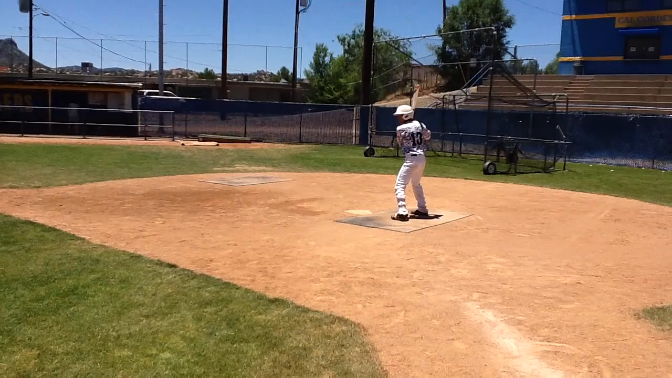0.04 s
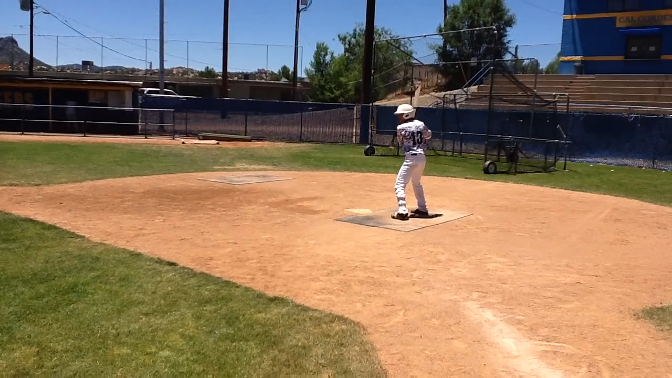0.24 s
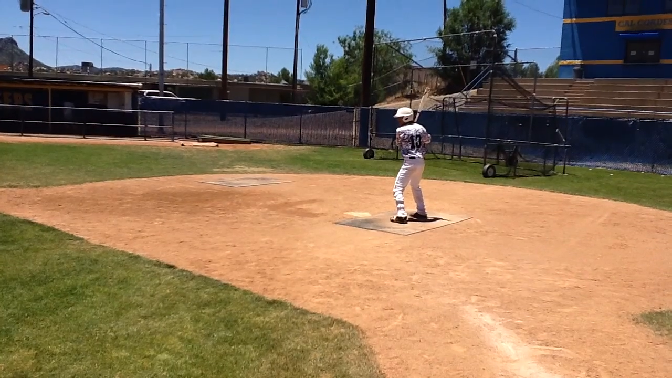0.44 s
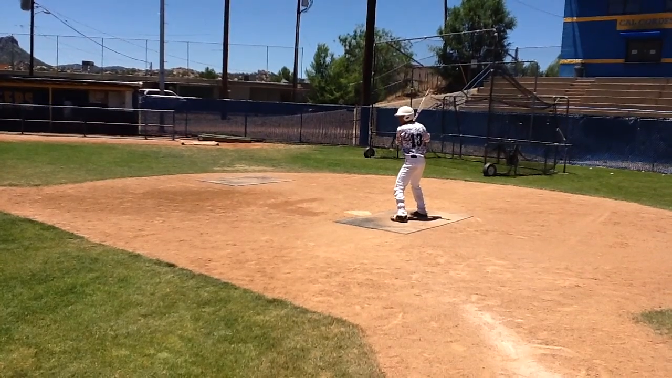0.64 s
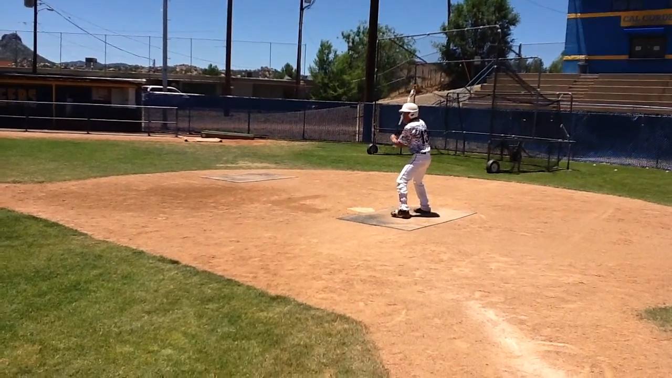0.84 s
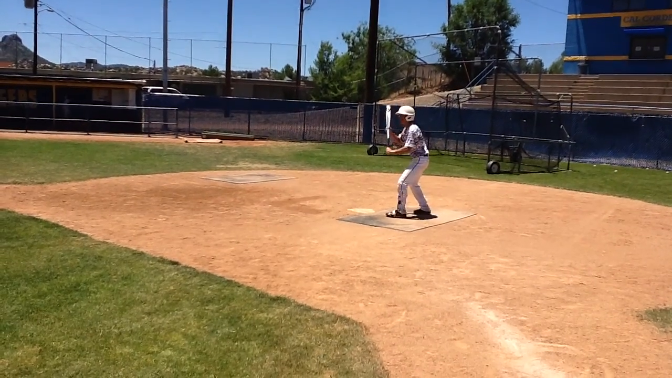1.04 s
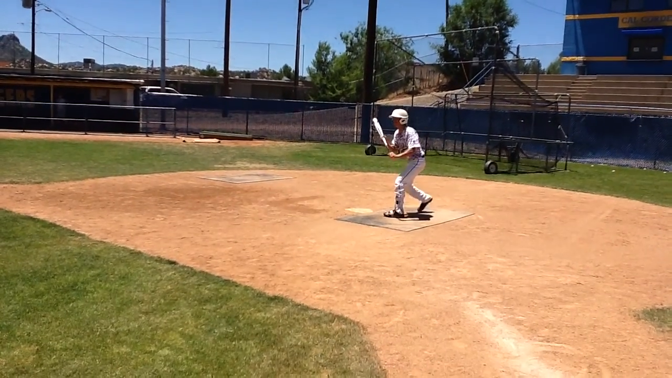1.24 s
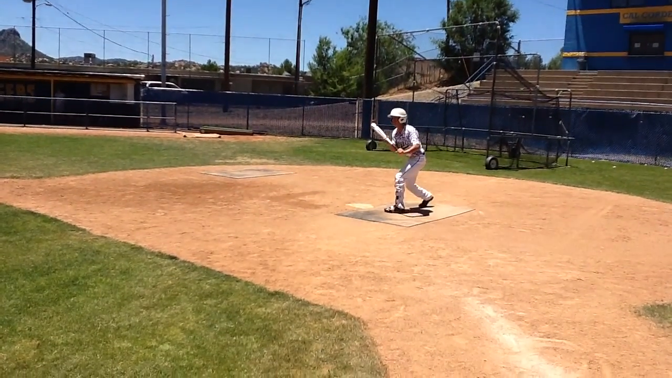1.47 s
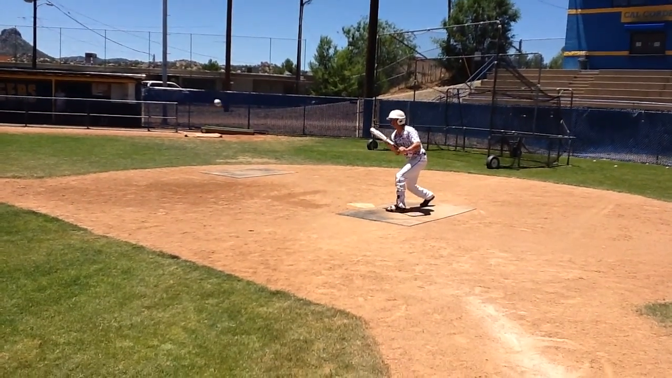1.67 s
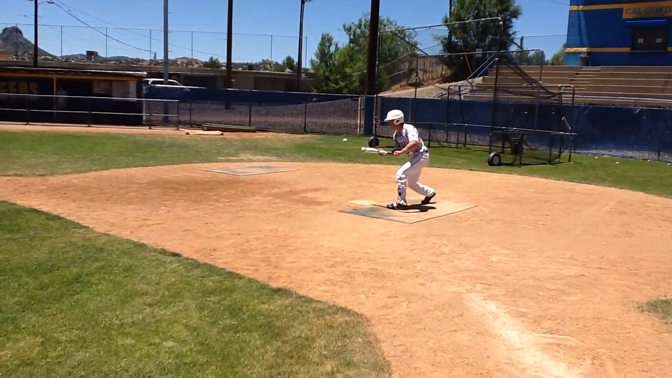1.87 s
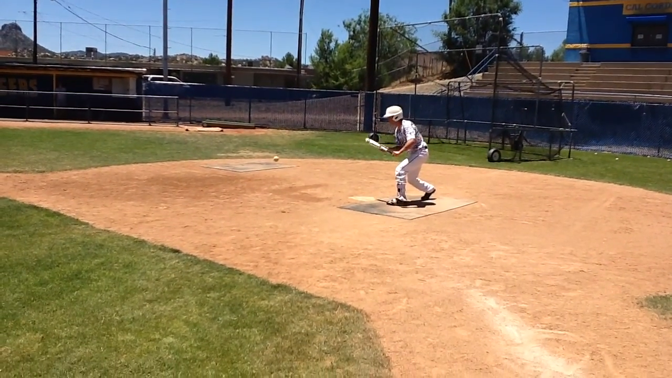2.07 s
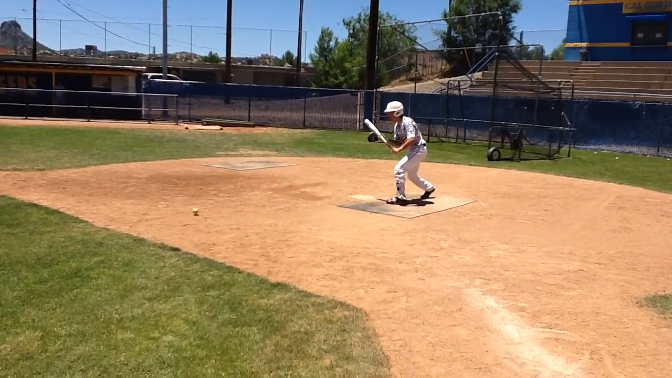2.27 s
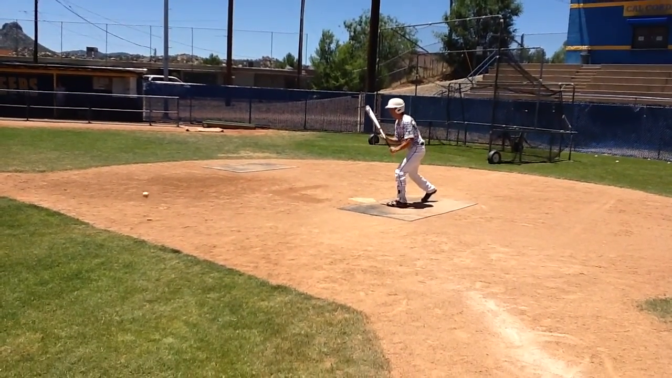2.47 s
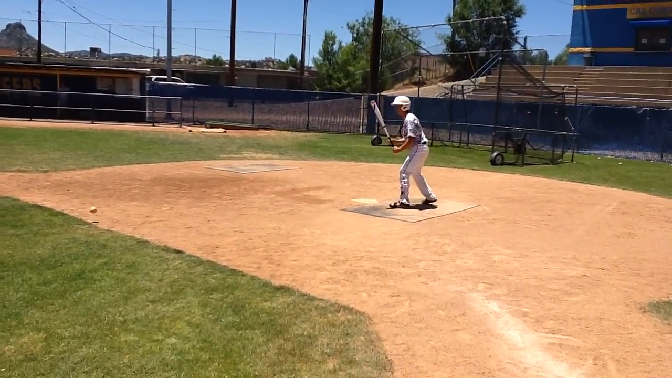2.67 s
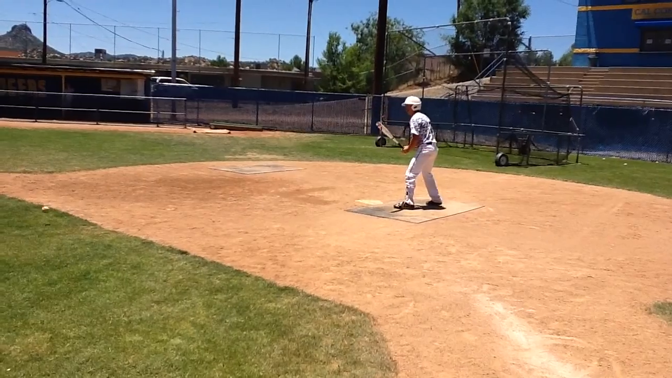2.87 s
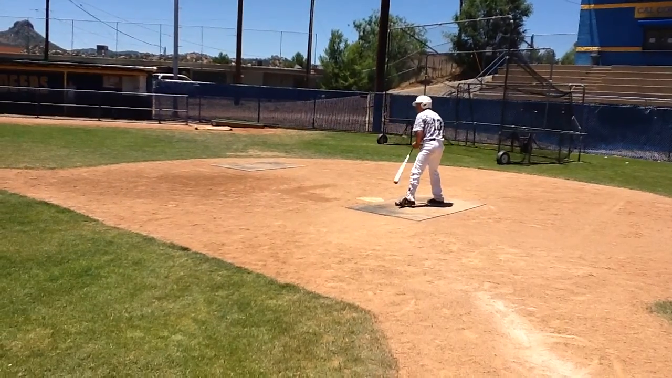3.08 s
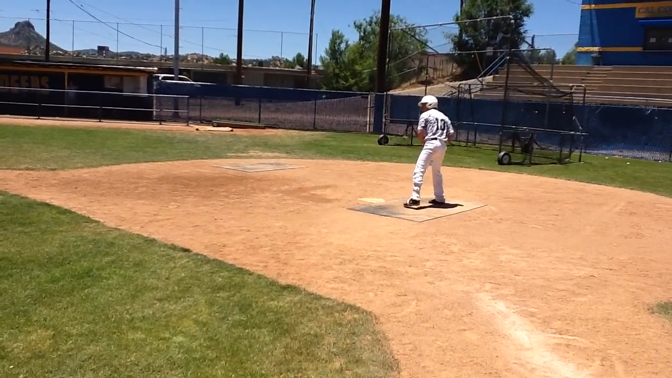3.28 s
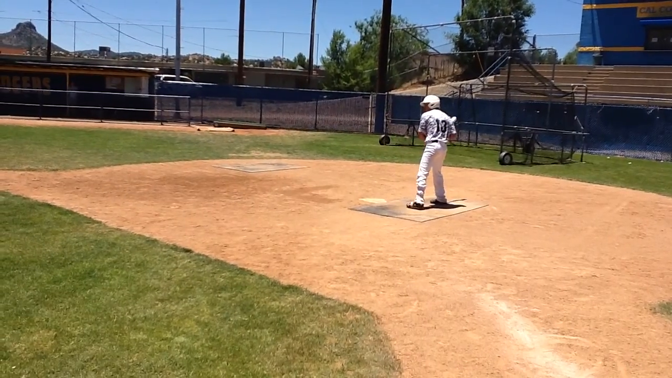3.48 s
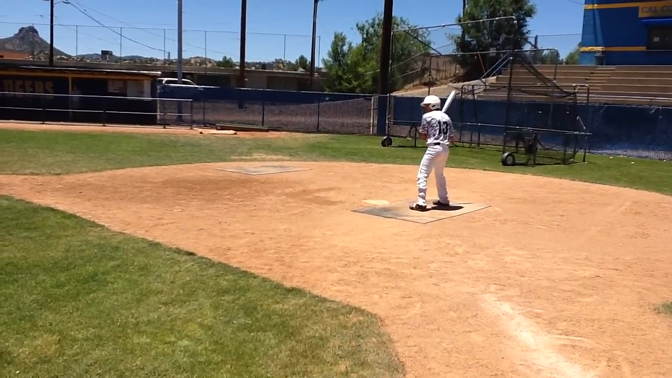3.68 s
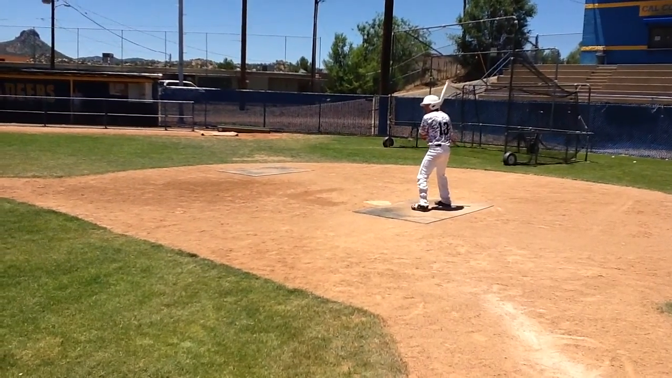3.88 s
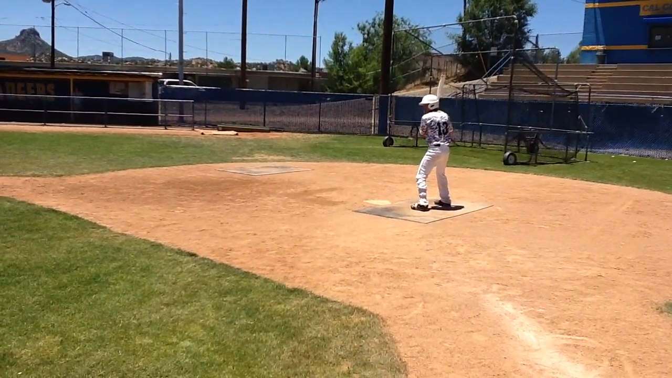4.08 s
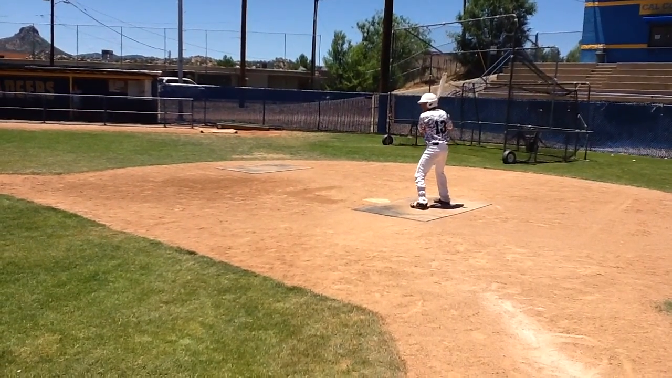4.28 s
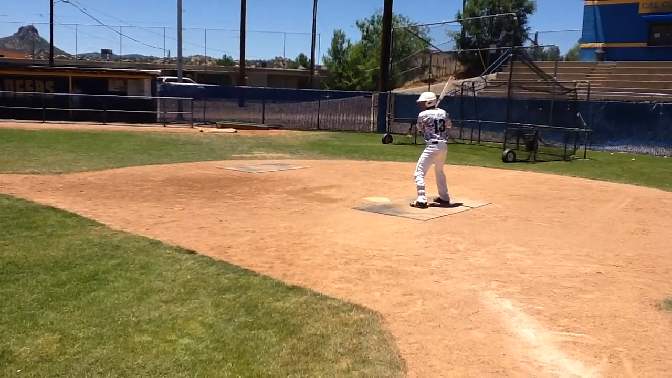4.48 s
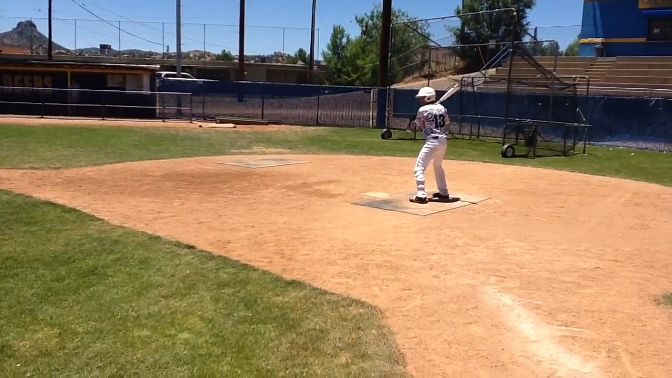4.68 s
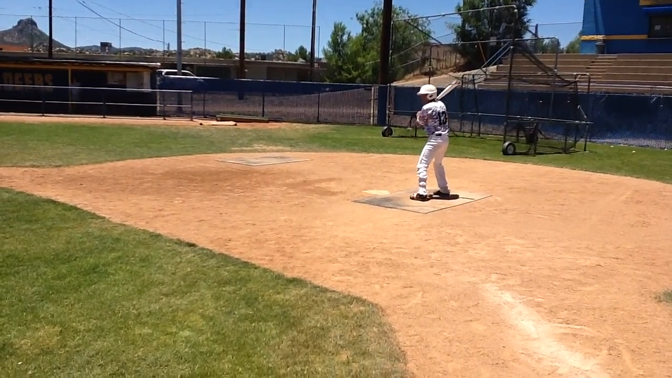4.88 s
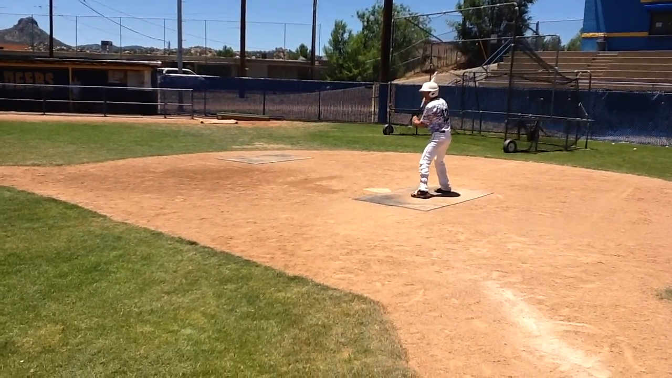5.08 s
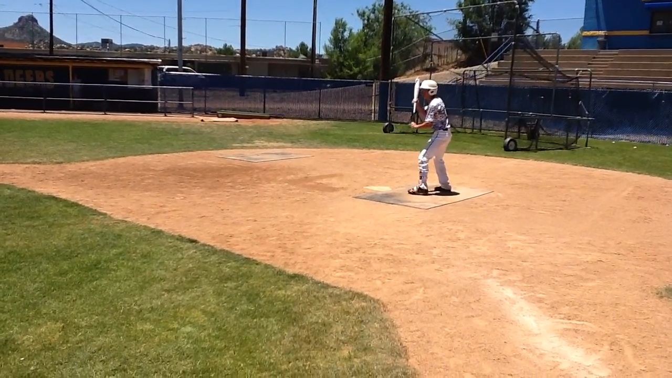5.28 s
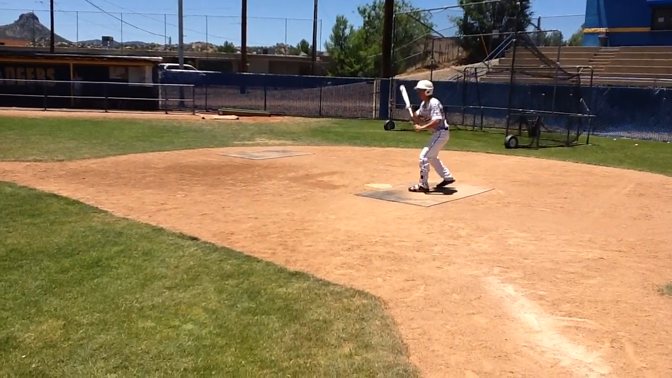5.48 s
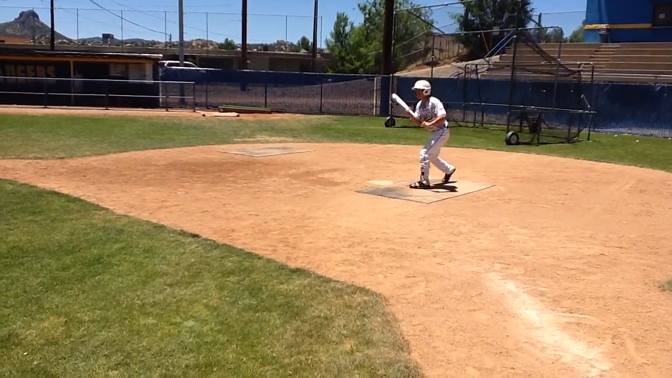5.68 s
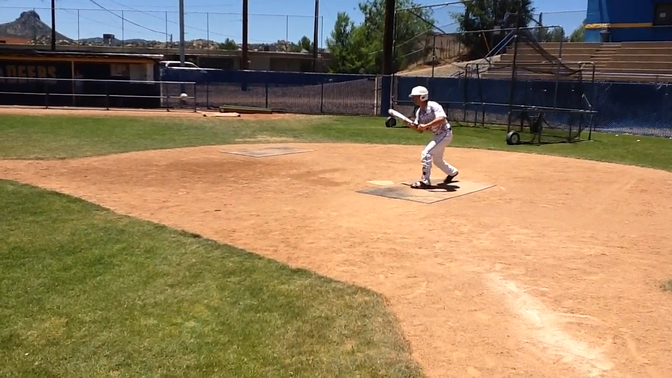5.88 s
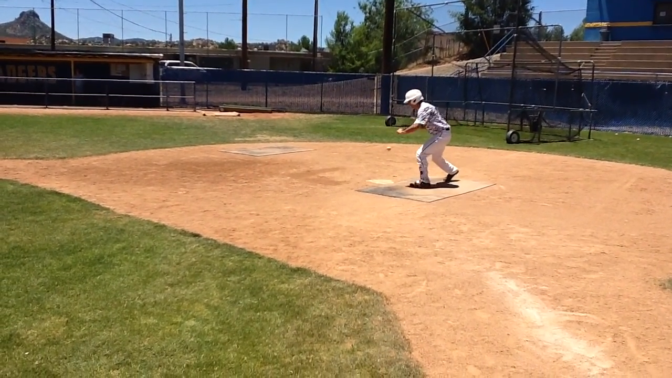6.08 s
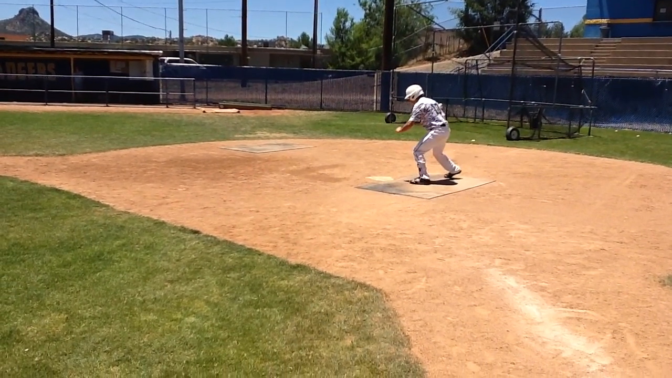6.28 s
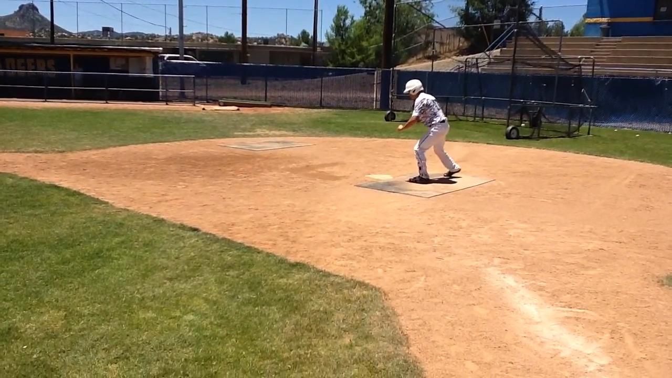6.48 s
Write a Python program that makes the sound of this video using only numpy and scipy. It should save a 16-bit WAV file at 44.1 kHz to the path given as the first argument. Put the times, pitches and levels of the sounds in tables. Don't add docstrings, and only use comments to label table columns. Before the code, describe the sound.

On an open ball field, small birds whistle quick gliding phrases over a faint distant rush and motor drone. Cleats crunch grit lightly, then a metal bat bunts a ball with one sharp, short ringing knock, echoed by fences and stands. The ball smacks hard dirt soon after. Wind gusts then rumble increasingly on the camera microphone, peaking in a rough flutter before easing and returning, with more soft steps and a final thud.

```python
import sys
import numpy as np
from scipy import signal
from scipy.fft import rfft, irfft, next_fast_len
from scipy.io import wavfile
from scipy.ndimage import uniform_filter1d, map_coordinates

SR = 44100
rng = np.random.default_rng(int(sys.argv[2]) if len(sys.argv) > 2 else 0)


def rack_gain(trim_db):
    fader = np.asarray(trim_db, float)
    return 10 ** (fader / 20)


def wrap_up_sound(samples):
    columns = np.atleast_2d(samples).T
    tamed = np.clip(columns, -1, 1)
    steps = np.round(tamed * 32767).astype(np.int16)
    wavfile.write(sys.argv[1], SR, steps)


N = 288061


def unit(x):
    return x / np.sqrt(np.mean(x ** 2) + 1e-20)


def curves(rows):
    s, *cols = np.transpose(rows)
    return [np.interp(np.arange(N) / SR, s, c) for c in cols]


def wobble(rate_hz):
    knots = rng.standard_normal(int(N * 100 / SR) + 4)
    return map_coordinates(knots, [np.arange(N) * min(rate_hz, 100) / SR])


def band(x, lo_hz, hi_hz):
    sos = signal.butter(2, [lo_hz, min(hi_hz, SR / 2.2)], "band", fs=SR, output="sos")
    return signal.sosfilt(sos, x)


def noise(points, patchy_db):
    z = signal.stft(rng.standard_normal(N + 512), nperseg=512)[2]
    patches = uniform_filter1d(uniform_filter1d(rng.standard_normal(z.shape), 5, 0), 12, 1)
    x = signal.istft(z * rack_gain(patchy_db * unit(patches)), nperseg=512)[1][:N]
    hz, db = np.transpose(points)
    m = next_fast_len(N)
    bins_hz = np.fft.rfftfreq(m, 1 / SR)
    gain_db = np.interp(np.log(bins_hz + 1), np.log(hz + 1), db)
    return unit(irfft(rfft(x, m) * rack_gain(gain_db), m)[:N])


def add(track, s, x):
    part = track[round(s * SR):][:len(x)]
    part += x[:len(part)]


def steady(x, span_s):
    size = int(span_s * SR)
    power = uniform_filter1d(uniform_filter1d(x ** 2, size), size)
    return unit(x / np.sqrt(np.abs(power) + 1e-6))


def eddies(db, swift_db):
    slow_db = db - 11 - 0.88 * swift_db
    fast_db = db - 17 + 0.98 * swift_db
    return rack_gain(2 * np.array([db, slow_db, fast_db]))


# time in seconds, strength in dB, swiftness in dB.
BREEZE = [(.05, -58.5, -4), (2.3, -61, 10.5), (2.45, -49.5, -4), (3.05, -53.5, 3.5), (3.22, -63.5, 7),
          (3.5, -48, -7), (3.9, -42.5, -5.5), (4.1, -51, 6), (4.3, -48.5, 14.5), (4.52, -39.5, 2.5),
          (4.78, -30.5, 16.5), (5.0, -37, -0.5), (5.25, -37, -3), (5.4, -46, 6.5), (5.8, -41.5, 6.5),
          (6.07, -46.5, -6.5), (6.3, -32, 6), (6.53, -38.5, -1)]
# peak time in seconds, peak in dB, half length in seconds, swiftness in dB.
GUSTS = [(2.666, -47.5, 0.022, -16), (2.792, -42, 0.034, -5), (2.955, -46, 0.038, -14),
         (3.282, -45, 0.017, -8), (3.587, -40, 0.06, -3.5), (3.725, -36, 0.013, 11.5),
         (3.872, -36.5, 0.015, -9), (3.964, -46, 0.037, -16), (4.162, -36, 0.036, -11.5),
         (4.398, -38.5, 0.029, -7), (4.562, -30.5, 0.022, -1), (4.61, -25, 0.016, 9.5),
         (4.643, -25.5, 0.017, 12.5), (4.659, -27.5, .012, 17.5), (4.676, -31.5, .012, 19),
         (4.694, -32, 0.014, 20.5), (4.716, -22, 0.023, 12), (4.735, -27, .012, 24),
         (4.756, -26.5, 0.022, 20.5), (4.773, -23, .01, 13.5), (4.781, -17.5, 0.013, 13),
         (4.799, -22, 0.017, 16), (4.814, -21, 0.013, 10.5), (4.829, -20, 0.014, 10.5),
         (4.852, -21, 0.013, 1), (4.886, -28.5, 0.014, 12.5), (4.904, -36, 0.011, 2),
         (4.932, -27.5, 0.011, 0), (5.109, -38.5, 0.021, 15), (5.05, -31.5, 0.066, 2),
         (5.188, -29.5, 0.037, -2), (5.213, -28.5, 0.014, 5), (5.306, -42, 0.059, -13),
         (5.482, -40, 0.054, -10.5), (5.572, -38, 0.088, -9), (5.682, -31, .035, -8),
         (5.827, -31.5, 0.078, -1), (5.914, -36, 0.058, -9.5), (5.994, -35.5, 0.0096, -9),
         (6.236, -38, 0.08, 13.5), (6.361, -21, 0.014, 5), (6.416, -39, 0.018, 20), (6.5, -35, 0.034, -12)]


def gust_power():
    power = eddies(*curves(BREEZE))
    t = np.arange(SR // 2) / SR - 1 / 4
    for s, db, half_s, swift_db in GUSTS:
        gust = eddies(db - 14.5 * (t / half_s) ** 2, swift_db)
        for track, part in zip(power, gust):
            add(track, s + t[0], part)
    return power


# frequency in Hz, level in dB per Hz.
ROLL = [(20, -47), (40, -27), (65, -13.5), (90, 3), (120, 2.5), (200, -37), (400, -87)]
BUFFET = [(50, -38), (90, -25), (130, -0.5), (165, 1.5), (230, -6), (300, -19.5), (450, -35.5), (900, -100)]
FLUTTER = [(120, -30), (220, 1.5), (300, 2.5), (360, 0), (520, -10), (800, -26), (1200, -45), (2200, -100)]
SPRAY = [(250, -48.5), (400, -1), (520, 0.5), (700, -9.5), (950, -19.5), (1300, -49), (2200, -100)]


def wind():
    power = gust_power()
    lumps = rack_gain(3.6 * wobble(35) + 1.6 * wobble(70))
    roll = steady(noise(ROLL, patchy_db=-8.5), span_s=0.024)
    buffet = steady(lumps * noise(BUFFET, patchy_db=1.0), span_s=0.033)
    flicker = rack_gain(0.31 * wobble(60))
    flutter = steady(lumps * flicker * noise(FLUTTER, patchy_db=3.5), span_s=0.022)
    spray = steady(noise(SPRAY, patchy_db=1.5), span_s=0.018)
    full = power[2] / (power[2] + rack_gain(2 * -28))
    thinned = rack_gain(1.5) * band(buffet, 125, 3000)
    buffet = buffet + full * (thinned - buffet)
    flutter = flutter + (full - 1) * band(flutter, 420, 3000) + full * rack_gain(-7) * spray
    return (np.sqrt(power) * [buffet, roll, flutter]).sum(axis=0)


# time in seconds, level in dB.
LEAVES = [
    (.1, -63.5),
    (.6, -61),
    (3.1, -62),
    (3.41, -59.5),
    (4.74, -61.5),
    (5.54, -59.5),
    (6.06, -60.5),
    (6.31, -56),
    (6.53, -60.5),
]
# frequency in Hz, amplitude in dB.
MOTOR = [(75.5, -72), (151, -51.5), (226, -64), (296, -74), (361, -75)]
# frequency in Hz, level in dB per Hz.
RUSH = [(18, -60), (30, -36), (91, -6.5), (129, -6), (149, -2), (330, -13), (614, -14), (864, -12.5),
        (1240, -16.5), (2260, -26), (3400, -31), (5000, -38), (6500, -75), (11000, -120)]
# frequency in Hz, level in dB per Hz.
HISS = [(1500, -38), (3000, -4), (5000, 1), (8000, 0), (13000, -2), (15500, -2.5)]


def field():
    turn = 2 * np.pi * np.cumsum(1 + 0.006 * wobble(2.5)) / SR
    drone = sum(rack_gain(db + 3.1 * wobble(8.4)) * np.sin(hz * turn) for hz, db in MOTOR)
    swell = rack_gain(curves(LEAVES)[0] + 7.0 + 1.13 * wobble(3.22))
    rush = swell * noise(RUSH, patchy_db=0.97)
    return rush + drone + rack_gain(-67.0) * noise(HISS, patchy_db=1.0)


def whistle(hz):
    quaver = unit(uniform_filter1d(rng.standard_normal(SR // 4), size=60))[:len(hz)]
    return np.sin(2 * np.pi * np.cumsum(hz * (1 + 0.0074 * quaver)) / SR)


EDGE_S = 0.003


def glide(length_s, start_hz, middle_hz, end_hz):
    u = np.linspace(0, 1, int((length_s + EDGE_S) * SR))
    hz = np.polyval(np.polyfit([0, .5, 1], [start_hz, middle_hz, end_hz], 2), u)
    return np.clip(np.minimum(u, 1 - u) * length_s / EDGE_S, 0, 1) * whistle(hz)


# time in seconds, level in dB, pitch ratio, lead-in level in dB.
ARCH_AT = [
    (0.233, -57, 0.98, -11),
    (0.956, -60.5, 1.0, -7),
    (1.459, -58.5, 1.014, -2),
    (2.648, -61, 1.0, -8),
    (3.648, -53.5, 1.01, -5),
    (4.309, -56.5, 1.0, -6),
    (4.912, -58, 0.98, -3),
    (6.463, -56.5, 1.02, -12),
]
# time in seconds, level in dB, pitch ratio.
DIP_AT = [
    (.128, -78, 1.07),
    (.27, -69, 1.07),
    (.403, -66.5, 1.06),
    (5.934, -69, 1.02),
    (6.07, -63, .98),
    (6.2, -60.5, 1.01),
    (6.338, -67, .98),
]
# seconds from the marker, Hz, level in dB.
LEAD = [(-.07, 5300, -17), (-.062, 5350, -17), (-.032, 5450, 0), (-.027, 5300, -30)]
UNDER = [(-.07, 4650, -20), (-.062, 4750, -18), (-.035, 5000, -9.5), (-.03, 5050, -34)]
DIP = [(-.032, 4860, -30), (-.024, 5400, -4), (-.014, 4740, -1.5), (-.004, 3900, 3), (.004, 3950, -2.5),
       (.015, 4870, 2.5), (.026, 5400, -4), (.034, 5350, -30)]


def connected_phrases(out):
    leads = [(at, db + lead_db, ratio) for at, db, ratio, lead_db in ARCH_AT]
    for path, times in ((LEAD, leads), (UNDER, leads), (DIP, DIP_AT)):
        s, hz, db = np.transpose(path)
        t = np.arange(s[0], s[-1], 1 / SR)
        smooth_hz = uniform_filter1d(np.interp(t, s, hz), size=90)
        for at, level_db, ratio in times:
            level = rack_gain(level_db + 2.5 + np.interp(t, s, db))
            add(out, at + s[0], level * whistle(ratio * smooth_hz))


# seconds from the marker, length in seconds, start Hz, end Hz, level in dB.
ARCH = [(-.023, .012, 3250, 4450, -3.5), (-.011, .012, 4450, 5200, -2), (.001, .01, 5200, 4450, -3.5),
        (.011, .008, 4300, 3500, -4.5), (.019, .016, 3450, 2900, -5), (.047, .022, 2750, 4150, -2),
        (.069, .016, 4100, 2950, -13.5), (.098, .012, 2800, 3000, -3.5), (.11, .014, 3050, 4000, -2),
        (.124, .012, 3950, 3100, -20)]
ZIGZAG = [(-.036, 0.022, 3190, 5740, -3.5), (-.012, 0.013, 4370, 4500, -1.5),
          (.002, 0.0166, 4565, 3030, 1.5), (.028, 0.0174, 3410, 4210, 1.5), (.047, .004, 4200, 5000, -6),
          (.052, 0.018, 3850, 3200, 2.5), (.076, 0.0085, 3094, 2930, -5)]
# time in seconds, level in dB, pitch ratio.
ZIGZAG_AT = [
    (0.536, -59, 0.97),
    (1.658, -63.5, 0.97),
    (3.519, -67, 0.97),
    (5.348, -65, 0.97),
]
# time in seconds, length in seconds, start Hz, end Hz, level in dB.
STROKES = [(.471, 0.024, 5650, 6080, -66.5), (0.533, 0.019, 4600, 5250, -66),
           (0.652, 0.04, 4450, 3770, -73), (2.541, 0.038, 4200, 4000, -67), (2.592, 0.014, 2660, 3440, -69),
           (.072, .018, 4550, 4020, -79), (2.92, .12, 7100, 7550, -78), (3.138, 0.025, 2600, 3400, -65),
           (3.207, 0.04, 3290, 3600, -66.5), (2.878, .016, 4400, 4280, -71),
           (3.778, 0.018, 5180, 4850, -67), (6.093, 0.029, 5250, 4700, -70),
           (4.084, 0.038, 3050, 3110, -72), (4.236, 0.017, 4170, 3690, -72),
           (4.709, 0.035, 2980, 3210, -67), (4.986, 0.011, 2530, 3520, -61),
           (5.001, 0.045, 3780, 3570, -64.5), (5.1, .014, 4960, 5000, -77), (6.11, 0.019, 2980, 3010, -70),
           (2.13, .022, 4100, 5100, -66), (2.152, .018, 5100, 3800, -67), (5.98, .033, 5100, 3000, -68),
           (6.02, .026, 3400, 4150, -67), (6.045, .022, 3900, 3300, -69), (3.675, .022, 4500, 4600, -66),
           (2.3, .03, 4100, 4000, -71), (3.478, .012, 3300, 2700, -68)]
# time in seconds, length in seconds, start Hz, middle Hz, level in dB.
FALLS = [(1.406, 0.024, 3450, 3220, -66), (1.8, .044, 3530, 3430, -68), (2.19, 0.063, 3990, 3540, -63),
         (2.55, 0.051, 4040, 3240, -62), (2.737, 0.055, 3300, 3586, -65), (2.897, 0.034, 3570, 3130, -62),
         (2.953, 0.016, 3500, 3070, -67), (3.09, 0.018, 3680, 3040, -62.5), (3.939, 0.1, 4450, 3730, -74.5),
         (3.985, 0.024, 3370, 3050, -74), (4.593, 0.013, 3000, 2800, -69.5),
         (4.946, 0.022, 3340, 2980, -60), (5.928, 0.049, 3906, 3520, -69)]
# time in seconds, length in seconds, edge Hz, bottom Hz, level in dB.
HOOKS = [
    (3.282, 0.0226, 3440, 3060, -64),
    (4.801, 0.0273, 4170, 3620, -64),
]


def glided_calls(out):
    strokes = list(STROKES)
    for phrase, times in ((ARCH, ARCH_AT), (ZIGZAG, ZIGZAG_AT)):
        for at, level_db, ratio, *_ in times:
            for s, length_s, a, b, db in phrase:
                strokes.append((at + s, length_s, ratio * a, ratio * b, db + level_db))
    calls = []
    for s, length_s, a, b, db in strokes:
        middle_hz = (a + b) / 2 + 0.101 * abs(a - b)
        calls.append((s, length_s, a, middle_hz, b, db))
    calls += [(s, length_s, a, b, 2750, db) for s, length_s, a, b, db in FALLS]
    calls += [(s, length_s, a, b, a, db) for s, length_s, a, b, db in HOOKS]
    for s, length_s, *pitches_hz, db in calls:
        add(out, s - EDGE_S / 2, rack_gain(db + 3.0) * glide(length_s, *pitches_hz))


def birds():
    out = np.zeros(N)
    connected_phrases(out)
    glided_calls(out)
    out *= rack_gain(2.86 * wobble(95))
    t = np.arange(SR // 4) / SR
    near = rng.standard_normal(len(t)) * rack_gain(-60 * t / 0.021) * (t > .003)
    far = rng.standard_normal(len(t)) * rack_gain(-60 * t / .5) * (t > .01)
    echo = rack_gain(-1.5) * near / np.linalg.norm(near) + rack_gain(-6.5) * far / np.linalg.norm(far)
    return out + signal.fftconvolve(out, echo)[:N]


# time in seconds, level in dB, length in ms, centre in Hz.
GRIT = [(0.92, -52.5, 1.4, 11100), (.926, -61, 6.4, 10970), (0.932, -49, 1.6, 3000), (1.073, -61, 2, 12400),
        (1.079, -53, 3.3, 11100), (1.0841, -49, 3.3, 11600), (1.119, -57, 1.6, 10900),
        (1.1305, -56, 1.5, 11500), (1.188, -67, 37, 8000), (1.2013, -60, 3, 10000), (1.214, -61, 3, 10000),
        (1.222, -62, 5.5, 8960), (1.3794, -56.5, 5.7, 10100), (1.4285, -48.5, 0.97, 11900),
        (1.4572, -55, 1.3, 12100), (1.577, -57.5, 3, 10600), (1.8638, -59, 1.5, 10500),
        (2.257, -56, 1.5, 10600), (2.262, -58, 1.5, 10600), (2.492, -57, 1.3, 4560),
        (2.6455, -60, 1.7, 7000), (2.7064, -64, 15, 8450), (2.856, -51.5, 2.5, 5000),
        (3.399, -67, 37, 10000), (3.432, -59, 3.8, 8000), (3.467, -54, 1.9, 4480), (3.4925, -57, 1.5, 7040),
        (3.499, -55, 1.5, 7100), (5.207, -63, 1.94, 7850), (5.227, -58.5, 7.3, 9000),
        (5.2651, -56.5, 3, 8000), (5.274, -60, 2, 8500), (5.4137, -53.5, 4, 9000), (5.426, -56, 2.2, 12000),
        (5.4532, -59, 2, 9000), (5.543, -60, 2, 7000), (5.559, -60, 4.5, 9000), (5.5656, -53.5, 2.1, 9500),
        (5.5658, -49.5, 2.5, 2460), (5.7335, -60, 2, 8000), (5.7709, -58, 2, 7000),
        (5.793, -58, 1.5, 12100), (5.7993, -50, 2.4, 11000), (5.8056, -52, 2, 11500),
        (6.2474, -53, 1.5, 7000), (6.306, -50, 2, 12000), (6.315, -62, 16, 11000)]
# time in seconds, level in dB, length in ms, centre in Hz.
SMACKS = [
    (2.4, -31.5, 1.14, 4800),
    (2.4016, -46, 1.57, 10940),
    (2.4002, -46, 1.5, 1300),
    (6.2975, -40, 2.7, 2900),
    (6.2992, -41, 1.7, 9400),
    (6.3666, -43.5, 1.7, 4970),
]
# time in seconds, level in dB, frequency in Hz, pressure sign.
THUDS = [
    (1.231, -22.5, 990, -1),
    (2.4012, -20, 310, 1),
    (5.565, -39, 490, -1),
    (6.2984, -12.5, 382, -1),
]


def dirt():
    out, t = np.zeros(N), np.arange(4000) / SR
    for s, db, ms, hz in GRIT + SMACKS:
        length_s = abs(ms) / 1000
        u = t / (length_s + 0.00022)
        grains = rng.standard_normal((3, len(t)))
        sizes = np.exp(0.5 * grains[1])
        snaps = grains[0] * sizes * u ** 0.71 * np.exp(-u ** 2)
        snaps += rack_gain(-24 - 60 * t / 0.043) * grains[2]
        crunch = band(snaps, hz / 2.14, hz * 1.42)
        add(out, s - .0003, rack_gain(db) * crunch / np.linalg.norm(crunch) * np.sqrt(length_s * SR))
    for s, db, hz, sign in THUDS:
        push = np.sin(2 * np.pi * hz * t) * hz * t * np.exp(1 - 5.7 * hz * t) * 2
        add(out, s, np.sign(sign) * rack_gain(db) * push)
    return out


def ringing(t, modes):
    onset = 1 - np.exp(-t / 0.00045)
    return sum(rack_gain(db - 60 * t / t60_s) * np.sin(2 * np.pi * hz * t) * onset for hz, db, t60_s in modes)


# time in seconds, level in dB.
HIT = (1.9454, -10)
# frequency in Hz, level in dB, t60 in seconds.
CONTACT = [(503, -2, 0.011), (785, -12.5, 0.033), (1033, 3.5, 0.024), (1270, 5, 0.01), (1450, 2, 0.014),
           (2120, 2, 0.014), (4000, -28, 0.026), (4750, -9, 0.01), (7100, -5.5, 0.005), (7600, -17, 0.0082),
           (8700, -23, 0.016), (12000, -38, .012)]
# frequency in Hz, level in dB, t60 in seconds.
RING = [(3360, -9.5, 0.061), (3450, -12.5, .045)]


def knock(out, t):
    modes = band(ringing(t, CONTACT), 210, 20000)
    crack = rack_gain(-7.5 - 60 * t / 0.0099) * band(rng.standard_normal(len(t)), 3400, 11200)
    rattle = rack_gain(-22.5 - 60 * t / 0.046) * band(rng.standard_normal(len(t)), 3200, 12000)
    touch = rack_gain(-23.0) * np.sin(2 * np.pi * 1700 * t[:30])
    snap = rack_gain(10) * band((t == 0) * 1.0, 3000, 10000)
    add(out, HIT[0] - .0007, touch)
    add(out, HIT[0], modes + ringing(t, RING) + crack + rattle)
    add(out, HIT[0] + .0002, snap)


# delay in seconds, level in dB, low edge in Hz, high edge in Hz, smear in seconds.
WALLS = [
    (0.018, -23, 1300, 6000, .003),
    (0.026, -26, 1410, 6500, 0.0029),
    (0.08, -12.5, 1350, 7850, 0.0018),
    (0.089, -14, 1600, 4750, 0.00092),
    (0.107, -11.5, 1800, 12200, 0.0003),
    (.117, -26, 1110, 4960, .002),
    (.135, -24, 3800, 11000, .012),
    (0.093, -32, 1200, 4000, .002),
]


def fence_echoes(out, sideways):
    for delay_s, db, lo_hz, hi_hz, smear_s in WALLS:
        rough = rng.standard_normal(2000) * np.exp(-np.arange(2000) / SR / smear_s)
        rough[0] = 3
        echo = np.convolve(sideways, rough / np.linalg.norm(rough))
        echo = band(band(echo, lo_hz, hi_hz), lo_hz, hi_hz)
        add(out, HIT[0] + delay_s, rack_gain(db) * echo)


# delay in seconds, level in dB.
SCATTER = [(.004, -37), (.03, -22), (0.076, -32), (0.108, -20), (.17, -23), (.25, -46), (0.451, -56)]
# frequency in Hz, level in dB, t60 in seconds.
FAR_RING = [(3380, -0.5, 0.072), (3315, -5, 0.056)]


def park_scatter(out, t, sideways):
    delay_s, db = np.transpose(SCATTER)
    lag_s = np.arange(SR // 2) / SR
    park = rng.standard_normal(len(lag_s)) * rack_gain(np.interp(lag_s, delay_s, db, left=-90) - 35.5)
    source = sideways + rack_gain(1.5) * ringing(t, FAR_RING)
    add(out, HIT[0], band(signal.fftconvolve(source, park), 1440, 6800))


def bat():
    out, t = np.zeros(N), np.arange(SR // 4) / SR
    knock(out, t)
    slap = rack_gain(14.5) * band((t == 0) * 1.0, 1600, 6400)
    slap += rack_gain(-12.5) * ringing(t, [(hz, 0, 0.0098) for hz in (2150, 2930, 4400, 5500)])
    sideways = rack_gain(-3.5) * ringing(t, CONTACT) + slap + rack_gain(-2.0) * ringing(t, RING)
    fence_echoes(out, sideways)
    park_scatter(out, t, sideways)
    return rack_gain(HIT[1]) * out


def scene():
    return (wind() + field() + birds() + dirt() + bat())[None]


def roll_off(x):
    return signal.sosfilt(signal.butter(12, 16380, fs=SR, output="sos"), x)


DROPOUT = (.0213, .0688)


def record(dry):
    t = np.arange(N) / SR
    passed = np.fft.rfftfreq(2 * N, 1 / SR) < 15300
    limited = irfft(rfft(dry, 2 * N) * passed, 2 * N)[:, :N]
    live = (t < DROPOUT[0]) | (t > DROPOUT[1])
    return roll_off(limited * live)


dry = scene()
out = record(dry)
wrap_up_sound(out)
```